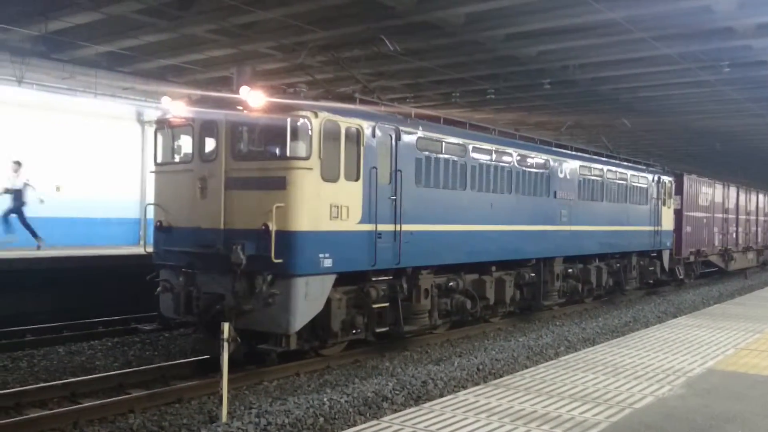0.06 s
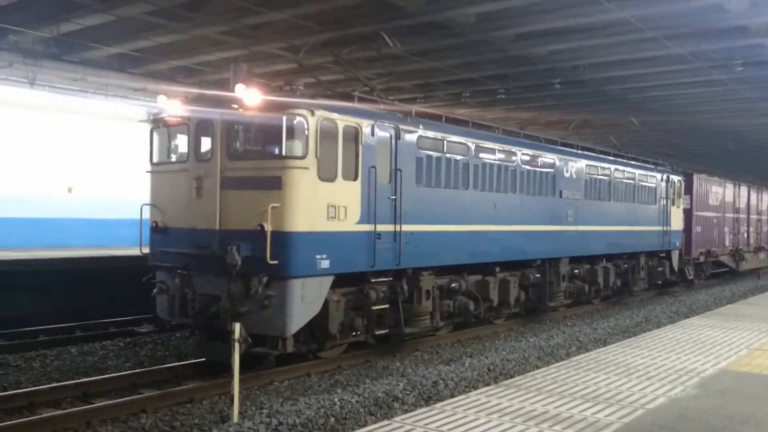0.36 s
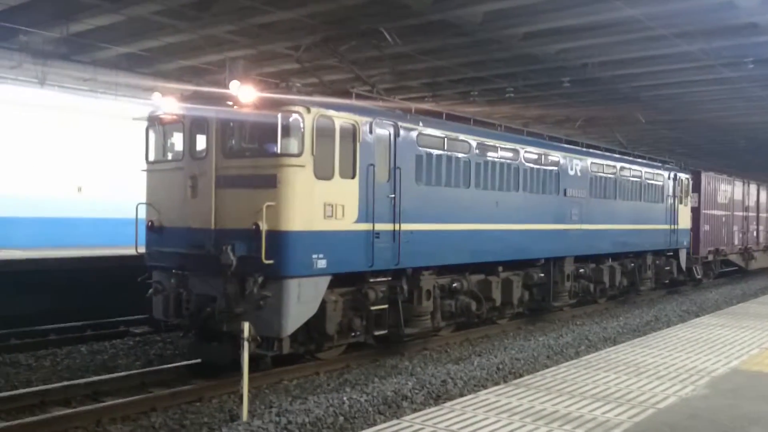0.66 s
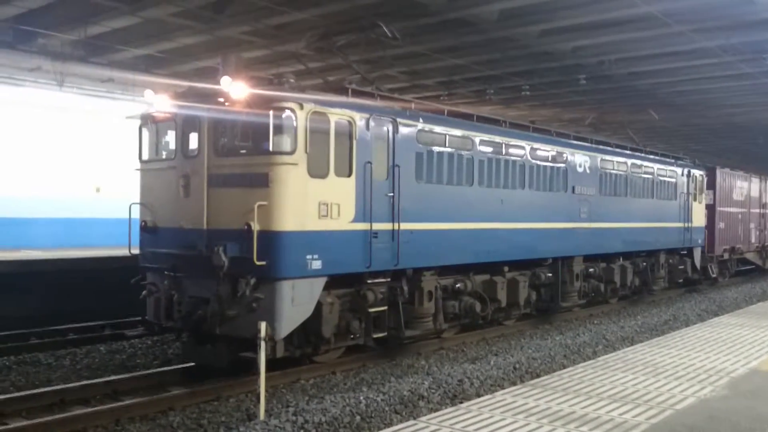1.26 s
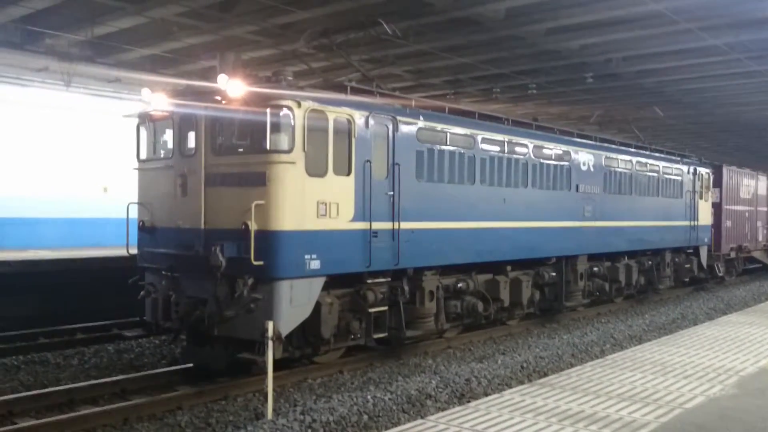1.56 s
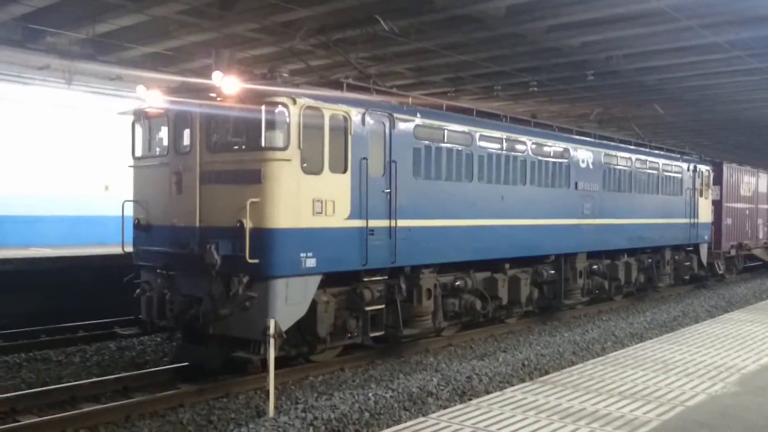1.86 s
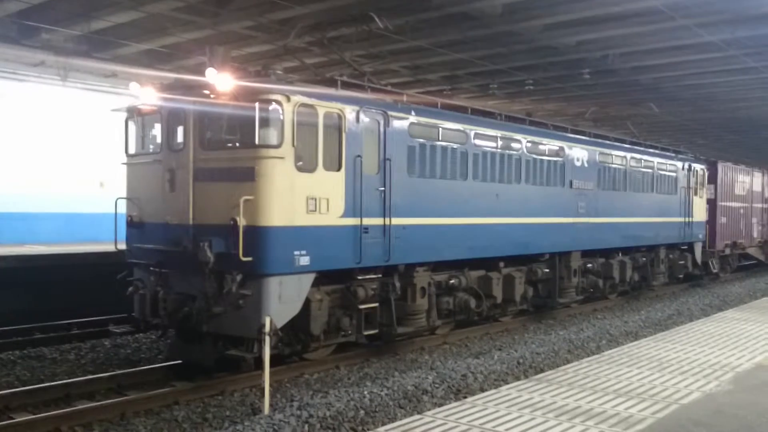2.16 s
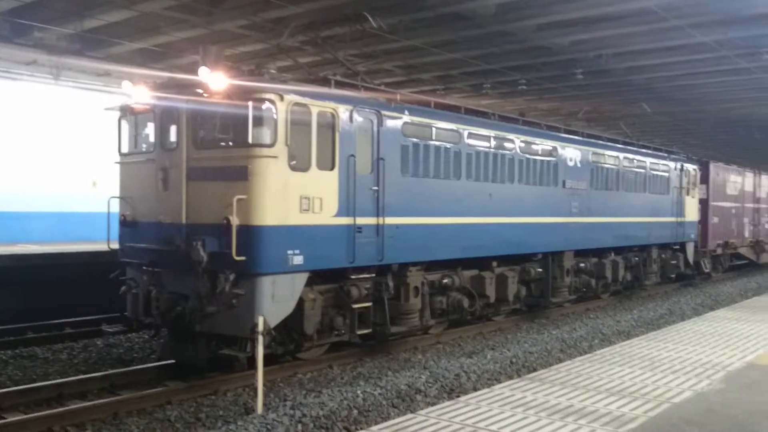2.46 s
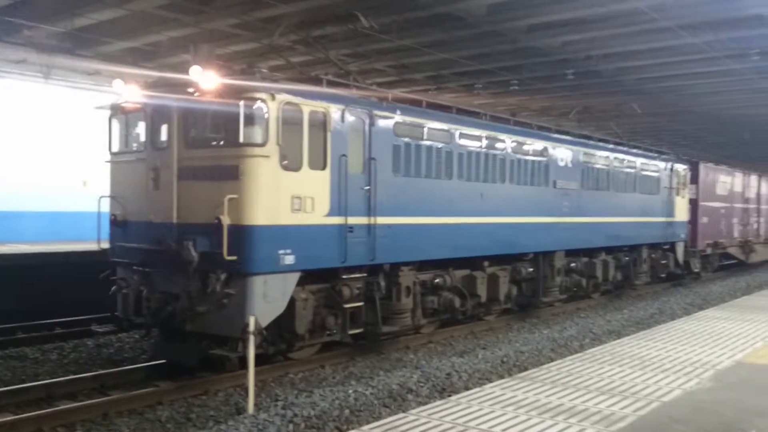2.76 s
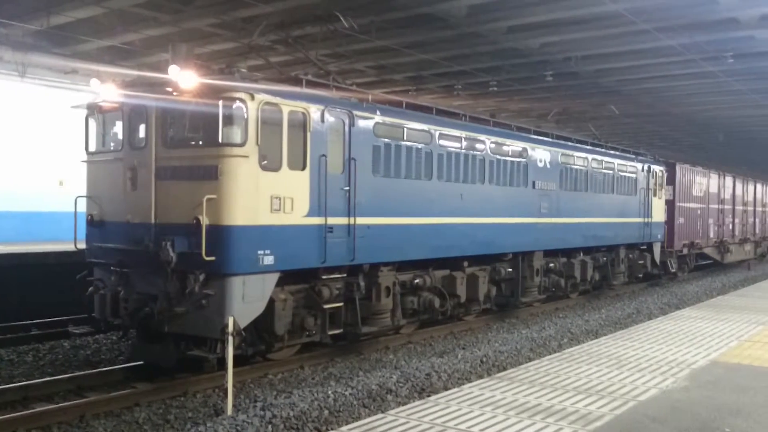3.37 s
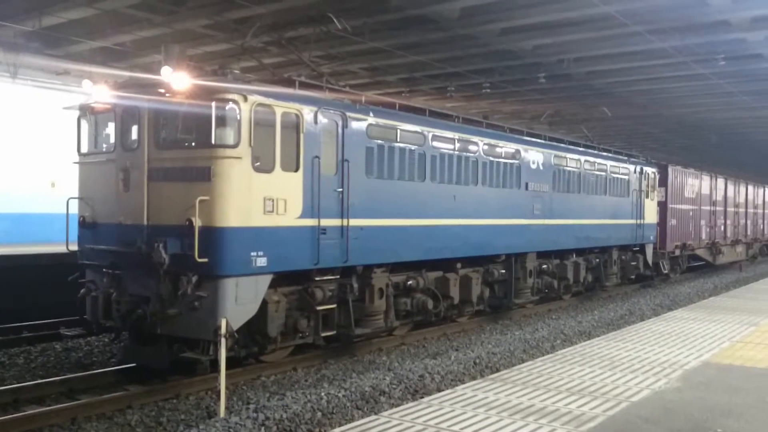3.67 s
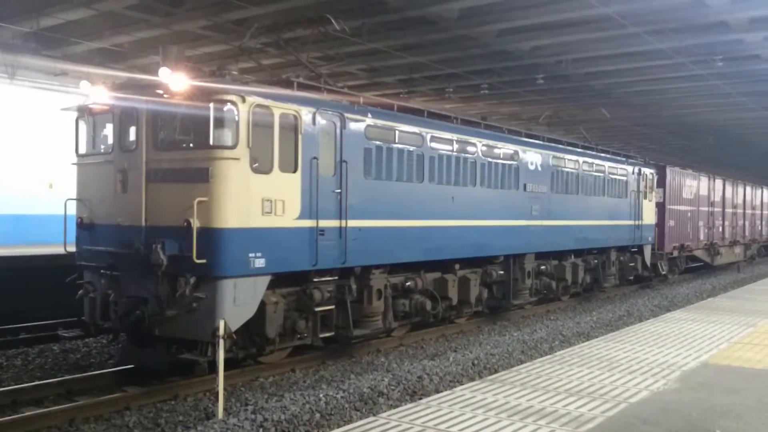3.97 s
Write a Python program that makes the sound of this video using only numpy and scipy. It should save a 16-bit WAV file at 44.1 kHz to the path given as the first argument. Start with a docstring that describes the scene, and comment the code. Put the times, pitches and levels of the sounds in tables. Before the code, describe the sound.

A freight train brakes slowly under a station roof, rumbling low throughout. At about 0.25 seconds a loud hiss and a high, unsteady squeal burst in on the right. The squeal eases by 1 second, while another wheel rasps, dipping and rising in pitch, and brief metallic tones ring out. The squeal swells again from 2 to 3 seconds, dips, then builds from 3.5 seconds over the continuing hiss.

```python
"""A low rumble comes first, then a sudden hiss and a high, unsteady squeal: a freight train
is braking slowly under a station roof, to the right of the microphone.
The brake shoes rub, and their friction hisses through the ringing wheels. One of a wheel's
natural notes (a "mode") swells into the squeal, while other modes sing up briefly.
The recorder's gain control turns everything down whenever the squeal grows loud."""
import sys
import numpy as np
from scipy import signal
from scipy.fft import rfft, irfft
from scipy.io import wavfile

SR = 44100
rng = np.random.default_rng(int(sys.argv[2]) if len(sys.argv) > 2 else 0)


def log_audio(samples):
    """Write samples as a 16-bit WAV file to the path given in sys.argv[1]."""
    # one column per channel
    frames = np.atleast_2d(samples).T
    # limit to full scale, then quantise
    limited = np.clip(frames, -1, 1)
    pcm = np.round(limited * 32767).astype(np.int16)
    wavfile.write(sys.argv[1], SR, pcm)


N = 176400
TIME = np.arange(N) / SR
FREQS = np.maximum(np.arange(N // 2 + 1) * SR / N, 1)

# how hard the shoes rub on the wheels: t/s, level/dB
FRICTION = [(0, -38), (.1, -42), (.17, -24), (.228, -19.5), (.255, -1.5), (.5, 1), (.95, -2), (1.4, -3),
            (2, -2), (2.5, -0.5), (3.25, -4), (3.7, -1), (4, -4)]
# how alike the left and right channels are: f/Hz, correlation (1 = the same)
LIKENESS = [(30, 0.99), (125, 0.94), (250, 0.94), (500, 0.74), (1000, 0), (2200, 0.26), (4000, 0.053),
            (12000, 0.035)]


def brake_squeal():
    """One wheel mode squeals, rough when weak and purer when strong; its neighbours ring with it."""
    # strength of the squeal: t/s, level/dB
    loudness = [(0, -55), (.232, -57), (.243, -12), (.27, 0), (.315, -4.5), (.37, -10.5), (.62, -12.5),
                (1, -18), (1.5, -18.5), (1.9, -19), (2.12, -8.5), (2.33, -7), (2.38, -4), (2.42, -3.5),
                (2.52, -11), (2.7, -9.5), (2.88, -10.5), (2.97, -19), (3.33, -17), (3.48, -11), (3.68, -5),
                (3.78, -5.5), (3.93, -2), (4, 2)]
    # the pitch creeps up as the shoe grips: t/s, f/Hz
    pitch = [(0, 6450), (.3, 6447), (1.5, 6510), (2.1, 6480), (2.4, 6495), (2.7, 6530), (3.3, 6534),
             (3.65, 6508), (4, 6530)]
    # the ringing around the squeal: f/Hz, level/dB
    ringing_spectrum = [(3500, -74.5), (5000, -62), (5600, -46.5), (6100, -42.5), (6450, -42.5),
                        (6750, -45.5), (7200, -69), (9000, -57), (14000, -83)]
    # neighbouring modes: f/Hz, width/Hz, boost/dB
    ringing_modes = [(5668, 44, 10), (5792, 32, 5), (5882, 30, 7), (5975, 45, 6), (6088, 30, 9),
                     (6160, 50, 5), (6288, 28, 6), (6410, 36, 8), (6595, 28, 8), (6692, 36, 8),
                     (8480, 120, 7), (9540, 130, 11)]
    level_db, = in_time(loudness)
    hz, = in_time(pitch)
    friction_db, = in_time(FRICTION)
    rough = singing_mode(hz, width_hz=80, steady=0.11) * from_db(level_db)
    pure_db = 1.1 * level_db - 0.5   # grows faster than the rough part
    pure = singing_mode(hz, width_hz=17.4, steady=0.9) * from_db(pure_db)
    ringing_db = 0.35 * level_db + friction_db / 2 + 0.9 * drift(rate_hz=25)
    ringing = resonant_noise(ringing_spectrum, ringing_modes, pan_db=-45) * from_db(ringing_db)
    # a higher mode whistles along
    whistle = singing_mode(hz=np.full(N, 9520), width_hz=80, steady=0.11) * from_db(level_db - 30)
    return (rough + pure) * panned(-16.5) + whistle + ringing


def brake_hiss():
    """The shoes' friction hisses through the ringing wheels, brighter as the train comes nearer."""
    # tone colour of the friction: f/Hz, level/dB
    spectrum = [(300, -71), (850, -62), (1500, -62), (2000, -62), (2220, -64), (2420, -57), (2800, -54),
                (3100, -54.5), (3500, -53.5), (4050, -53), (4900, -53.5), (6500, -47.5), (7600, -53),
                (9200, -58.5), (13000, -62.5), (15700, -58)]
    # notes at which wheels and brake rods ring: f/Hz, width/Hz, boost/dB
    wheel_modes = [(915, 55, 5), (1112, 35, 8), (1246, 30, 15), (1345, 42, 7), (1482, 40, 10),
                   (1560, 35, 5), (1725, 65, 10), (1805, 35, 5), (2120, 60, 6), (2330, 60, 4),
                   (2510, 65, 10), (2705, 50, 7), (2880, 48, 8), (3135, 32, 6), (3315, 35, 5),
                   (3430, 65, 11), (3572, 90, 11), (3690, 65, 6), (4200, 40, 5), (4564, 38, 11),
                   (4635, 42, 10), (4850, 50, 6), (4940, 38, 7), (5015, 25, 4), (5066, 28, 5),
                   (5290, 60, 5), (7080, 26, 8), (7232, 34, 6), (7360, 40, 5), (7930, 120, 3),
                   (8450, 170, 6), (9550, 200, 5), (10900, 600, 4), (11850, 250, 4)]
    # where the hiss sits: f/Hz, left minus right/dB
    pan = [(900, -2), (1400, 0.5), (3400, -.5), (4700, -3), (5500, -1.5), (7500, -9), (10800, -4),
           (13200, -2), (15000, -4)]
    friction_db, = in_time(FRICTION)
    hiss = resonant_noise(spectrum, wheel_modes, over_freqs(pan))
    treble_db = 1.5 * (TIME - TIME.mean())
    hiss = shelf_in_time(hiss, corner_hz=10200, kind="high", db=treble_db)
    flutter_db = 0.5 * drift(rate_hz=8)
    return hiss * from_db(friction_db + flutter_db)


def second_wheel():
    """Another wheel rasps: its rougher squeal sinks away, slides up again and fades."""
    # path of this squeal: t/s, f/Hz, level/dB
    glide = [(.25, 6300, -52), (.42, 6250, -15), (.7, 6300, -19), (1.15, 6100, -31.5), (1.5, 5780, -22),
             (1.85, 5950, -14.5), (2.02, 6100, -12.5), (2.22, 6150, -17), (2.4, 6150, -25),
             (2.6, 6150, -70)]
    hz, level_db = in_time(glide)
    return singing_mode(hz, width_hz=340, steady=0.08) * from_db(level_db) * panned(-15)


def swelling_modes():
    """Friction catches single wheel modes, which sing up and die away."""
    # one row per swell: middle t/s, length/s, f/Hz, peak level/dB, left minus right/dB
    swells = [(0.465, .3, 6160, -16, -14), (0.554, 0.64, 3538, -24, 4), (.85, .9, 913, -36, -6),
              (0.896, .2, 4570, -22, -2), (1.385, 0.19, 4610, -27, 6), (2.628, .4, 3530, -22, 1.5),
              (3.098, 0.21, 6380, -15, -14), (3.278, .2, 5030, -22.5, -1), (3.254, .4, 5600, -26, -9)]
    out = np.zeros((2, N))
    for middle_s, length_s, hz, peak_db, pan_db in swells:
        swell = np.cos(np.pi * np.clip((TIME - middle_s) / length_s, -.5, .5))
        tone = singing_mode(np.full(N, hz), width_hz=54, steady=0)
        out += tone * swell * from_db(peak_db) * panned(pan_db)
    return out


def rumble():
    """The rolling train and its blowers rumble under the roof."""
    # tone colour of wagons and blowers: f/Hz, level/dB
    spectrum = [(15, -72), (30, -56), (48, -49), (60, -39), (88, -44.5), (135, -54.5), (250, -50),
                (350, -53), (520, -56.5), (800, -62.5), (1100, -67.5), (2000, -67.5), (3300, -72),
                (4500, -82.5), (8000, -89), (12000, -102)]
    # low humming notes: f/Hz, width/Hz, boost/dB
    hums = [(115, 14, 7.5), (168.5, 17, 8.5), (243, 20, 1)]
    # where the rumble sits: f/Hz, left minus right/dB
    pan = [(60, -1.5), (200, -2), (600, -3.5), (1500, -3.5)]
    # rise and fall of the deepest bass: t/s, boost/dB
    bass = [(0, -7), (.14, 3), (.35, -5), (.8, -6), (1.3, -2), (1.95, -3), (2.3, 0), (3.05, 0), (3.6, 3.5),
            (4, 11)]
    bass_db, = in_time(bass)
    rolling = resonant_noise(spectrum, hums, over_freqs(pan))
    rolling = shelf_in_time(rolling, corner_hz=75, kind="low", db=bass_db)
    flutter_db = 0.83 * drift(rate_hz=15)
    return rolling * from_db(flutter_db)


def station_echoes(count=12, delays_s=(.001, .05), echo_db=-14):
    """Echoes off roof, platform and train colour each ear's sound differently, but hardly the bass."""
    taps = np.zeros((2, N))
    taps[:, 0] = 1   # the direct sound
    for ear in taps:
        signs = rng.choice([-1, 1], count)
        arrivals = (rng.uniform(*delays_s, count) * SR).astype(int)
        ear[arrivals] += from_db(echo_db) * signs
    response = rfft(taps) / np.sqrt(np.sum(taps ** 2, axis=1, keepdims=True))
    unlike = 1 - np.clip(over_freqs(LIKENESS), 0, 1)
    return np.abs(response) ** unlike


def singing_mode(hz, width_hz, steady):
    """A rubbed mode wavers as its many paths mix at each ear; steady (0 to 1) evens out its swing."""
    carrier = np.exp(2j * np.pi * np.cumsum(hz) / SR)
    ears = []
    for _ in range(2):
        swing = drift(width_hz / 2) + 1j * drift(width_hz / 2)
        saturation = (np.abs(swing) ** 2 + 0.3) ** (steady / 2)
        tone = np.real(swing * carrier) / saturation
        ears.append(tone / tone.std())
    return np.array(ears)


def resonant_noise(spectrum, modes, pan_db):
    """Stereo noise shaped by a broad tone colour, ringing modes and the station's echoes."""
    peaks_db = sum(boost / (1 + (2 * (FREQS - hz) / width) ** 2) for hz, width, boost in modes)
    colour = from_db(over_freqs(spectrum) + peaks_db)
    alike = np.clip(over_freqs(LIKENESS), -1, 1)
    mid, side = rfft(rng.standard_normal((2, N)))
    ears = np.sqrt(1 + alike) * mid + np.sqrt(1 - alike) * side * [[1], [-1]]
    return irfft(ears * colour * panned(pan_db) * station_echoes(), N) * np.sqrt(SR) / 2


def shelf_in_time(sound, corner_hz, kind, db):
    """Turn the part below ("low") or above ("high") a frequency up or down over time."""
    low_share = 1 / (1 + (FREQS / corner_hz) ** 8)
    part = irfft(rfft(sound) * (low_share if kind == "low" else 1 - low_share), N)
    return sound + part * (from_db(db) - 1)


def drift(rate_hz, size=8820):
    """A smooth random wobble of typical size 1, mostly slower than rate_hz."""
    smoothing = 1 + (FREQS[:size // 2 + 1] / rate_hz) ** 2
    slow = irfft(rfft(rng.standard_normal(size)) / smoothing, size)
    return np.interp(TIME, np.linspace(0, TIME[-1], size), slow / slow.std())


def panned(pan_db):
    """Left and right gains; a negative pan_db makes the left quieter."""
    left = np.atleast_1d(from_db(pan_db))
    return np.array([left, np.ones_like(left)])


def from_db(db):
    """Turn decibels into a gain."""
    return 10 ** (np.asarray(db) / 20)


def in_time(rows):
    """Join a table's points over time, giving one curve for each column after the first."""
    times, *columns = np.transpose(rows)
    return [np.interp(TIME, times, column) for column in columns]


def over_freqs(points):
    """Join a table's points over frequency, with every octave equally wide."""
    hz, value = np.transpose(points)
    return np.interp(np.log(FREQS), np.log(hz), value)


def scene():
    """All the sounds of the braking train together."""
    return rumble() + brake_hiss() + brake_squeal() + second_wheel() + swelling_modes()


def record(dry):
    """Gain control follows the louder channel; peaks are rounded off and the highest treble is cut."""
    threshold_db, cut_per_db = -15, 0.7
    attack_s, lookahead_s, release_db_per_s = 0.027, 0.014, 20.5
    memory = np.exp(-1 / (attack_s * SR))
    power = signal.lfilter([1 - memory], [1, -memory], dry ** 2).max(axis=0)
    over_db = np.maximum(10 * np.log10(power + 1e-12) - threshold_db, 0)
    # hold each peak and let it go slowly
    fall_db = release_db_per_s * TIME
    held_db = np.maximum.accumulate(over_db + fall_db) - fall_db
    held_db = np.interp(TIME + lookahead_s, TIME, held_db)
    polarity = [[-1], [1]]   # the microphone's two sides are wired opposite ways
    out = dry * from_db(-cut_per_db * held_db) * polarity
    rounded = out / (1 + out ** 8) ** (1 / 8)
    cutoff_hz = 15750
    return signal.sosfilt(signal.ellip(12, .1, 80, cutoff_hz, fs=SR, output="sos"), rounded)


dry = scene()
out = record(dry)
log_audio(out)
```